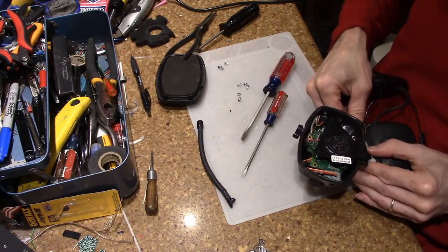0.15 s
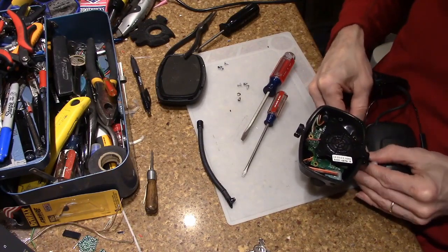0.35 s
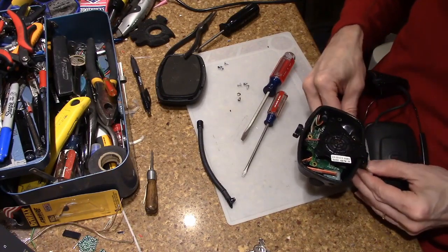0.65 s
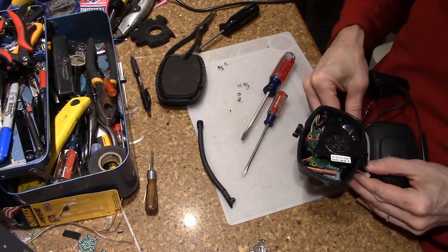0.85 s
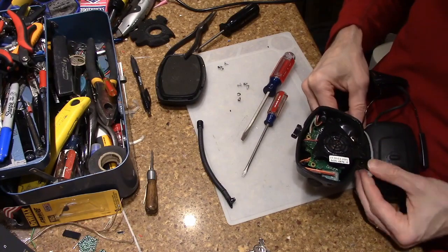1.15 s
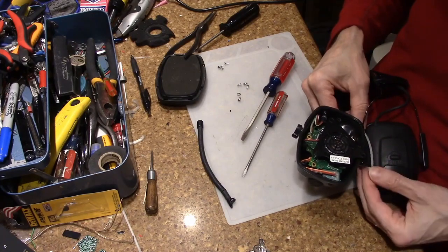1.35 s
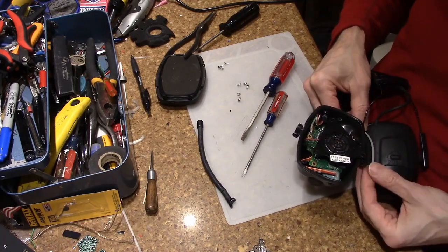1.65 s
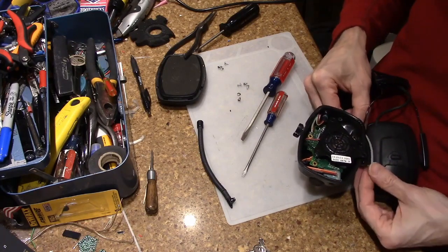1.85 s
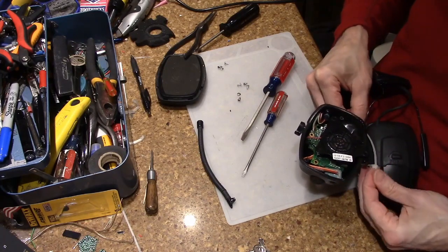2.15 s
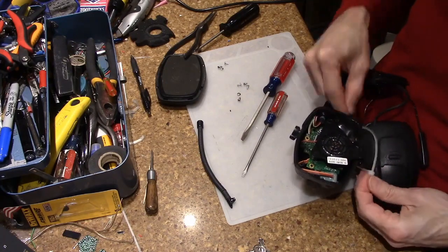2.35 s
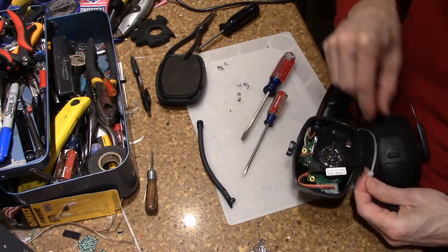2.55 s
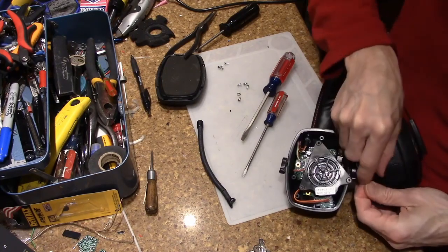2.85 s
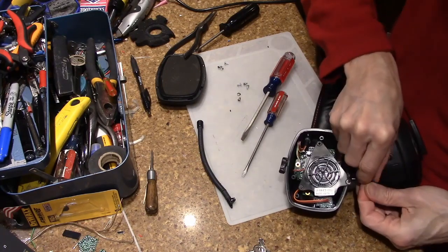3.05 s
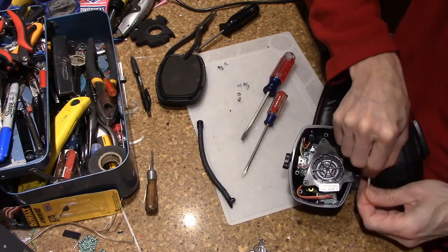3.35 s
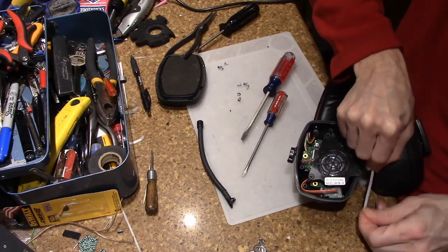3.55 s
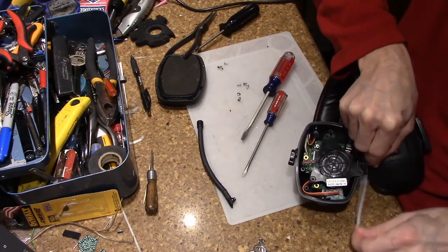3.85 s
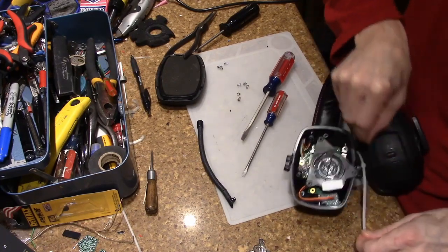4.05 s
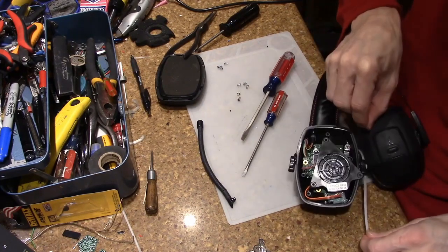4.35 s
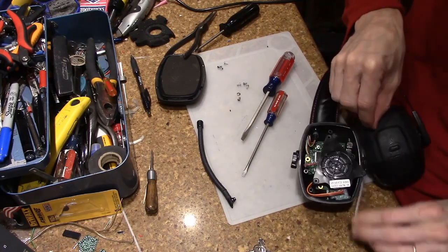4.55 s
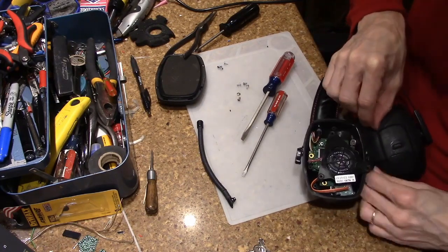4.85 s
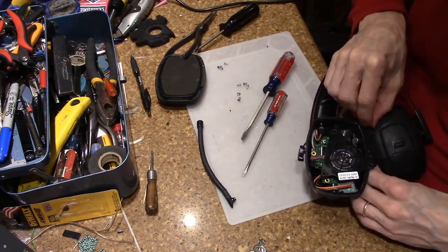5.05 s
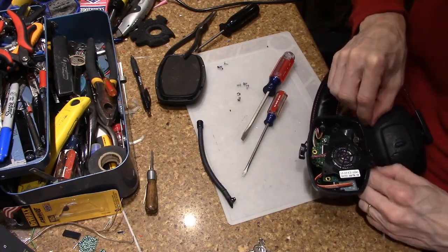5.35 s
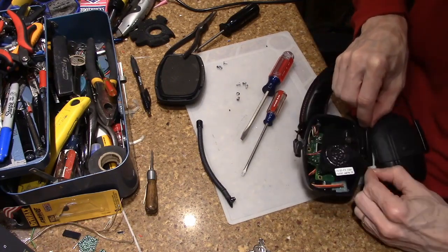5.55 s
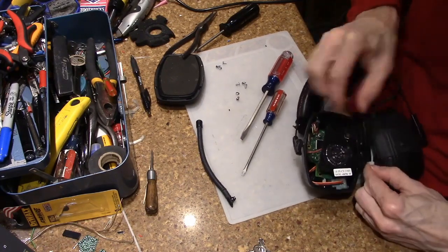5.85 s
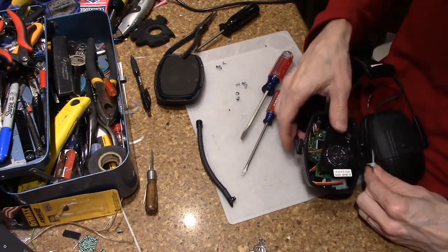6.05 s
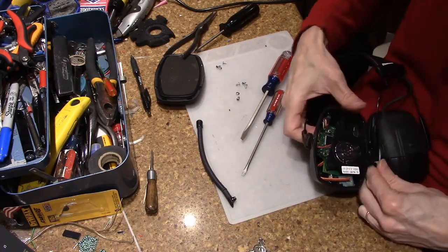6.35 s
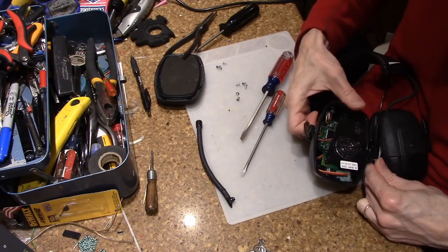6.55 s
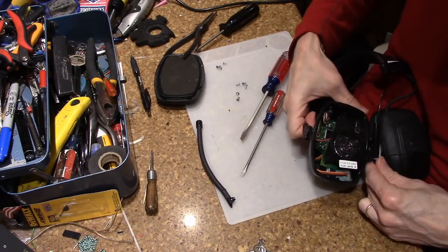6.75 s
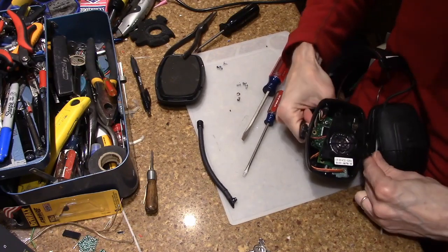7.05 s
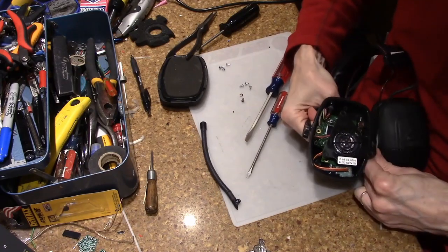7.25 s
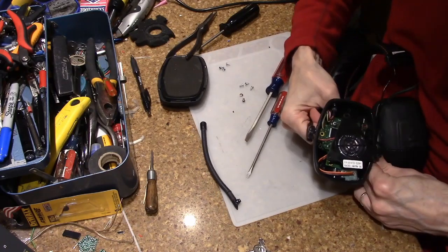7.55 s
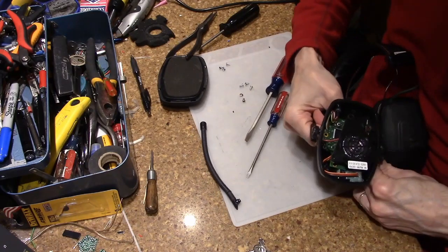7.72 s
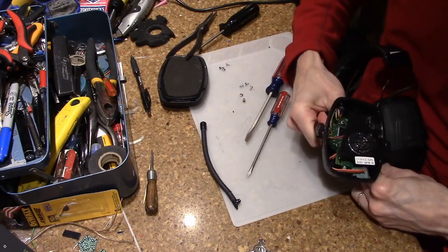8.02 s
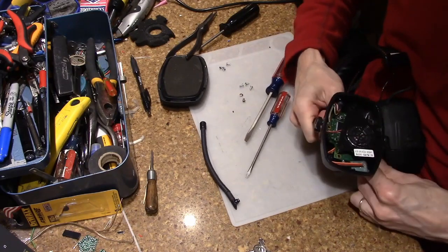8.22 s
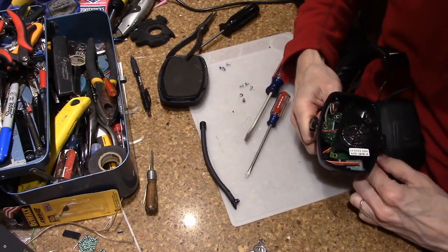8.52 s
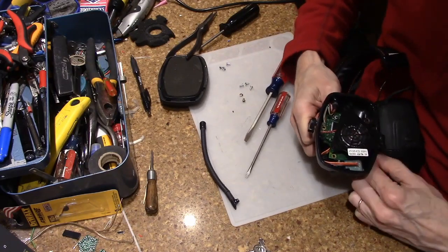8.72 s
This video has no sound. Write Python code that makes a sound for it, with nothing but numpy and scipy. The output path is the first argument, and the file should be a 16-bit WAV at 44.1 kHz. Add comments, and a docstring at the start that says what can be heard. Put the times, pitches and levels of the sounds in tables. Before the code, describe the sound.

Close handling of hollow plastic earmuff cups at a workbench. Faint ticks and rubs come first, then a cable tie is pulled tight with a half-second ratchety zip, followed by a cluster of bright clicks. After a quiet spell a loud hollow clatter with a low bench thump lands, then smaller clacks and scrapes. A small room answers lightly, with soft background noise and faint hum.

```python
"""A pawl buzzes over the teeth of a plastic cable tie pulled round an earmuff cup on a workbench, while
the hollow cups click, rub, knock together and thump on the bench, over soft room noise and faint hum.
Tooth snaps and contacts are filtered noise bursts; the shell and bench add decaying modes, and the strap
a resonance. Rubs are uneven noise from many slips. A small room answers with a dense decaying tail."""
import sys
import numpy as np
from scipy import signal
from scipy.fft import rfft, irfft
from scipy.io import wavfile

SR = 44100
rng = np.random.default_rng(int(sys.argv[2]) if len(sys.argv) > 2 else 0)


def dump(signal):
    """Clip the signal to [-1, 1] and save it as 16-bit WAV at the path in sys.argv[1]."""
    limited = np.clip(np.atleast_2d(signal).T, -1, 1)
    pcm = np.round(limited * 32767).astype(np.int16)
    wavfile.write(sys.argv[1], SR, pcm)


N = 391608
TIME = np.arange(N) / SR  # s
AGE = TIME[:2 ** 14]  # s since the start of one impact

# Modes of the cup shell, levels relative to each other: frequency_hz, level_db, t60_s
SHELL_MODES = [(447, -29, 0.3), (728.4, -18, 0.14), (845, -31.5, .16), (998, -21.5, 0.075),
               (1217, -25, 0.097), (1348, -29, 0.089), (1504, -31, 0.19), (1830, -16, 0.04),
               (1928, -17.5, 0.063), (2802, -19, 0.054), (2970, -18.5, 0.029), (3140, -23.5, .1),
               (4590, -18.5, 0.1), (6240, -16, 0.061)]
# Fingers and strap sliding on the shell, before the scene's rub gain:
# start_s, length_s, level_db, tilt_db_per_octave
RUB_STROKES = [(0.324, 0.26, -66, 4), (0.512, .21, -60.5, -1.5), (1.152, 0.14, -62, .5),
               (2.222, 0.29, -56, .5), (2.813, .16, -54.5, 0.5), (3.035, .07, -57.5, -3),
               (4.017, 0.35, -50, -1.5), (4.59, 0.074, -44, 1.5), (4.667, 0.117, -51.5, 3.5),
               (4.857, .17, -52.5, 1), (5.07, 0.26, -60, -0.5), (6.046, 0.16, -51, 2.5),
               (6.214, 0.085, -44, 1), (6.278, 0.39, -51, 0.6), (6.662, 0.398, -57, 1.3),
               (7.119, .18, -51, -1.5), (7.535, .2, -53.5, -1.5), (8.1, .11, -49.5, -3),
               (8.35, 0.037, -40.5, 2), (8.77, .16, -55, -1.5)]


def undb(db):
    """Level is logarithmic: 20 dB is a factor of ten in amplitude."""
    return 10 ** (np.asarray(db) / 20)


def unit(x):
    """Root-mean-square normalisation: scale a signal to rms 1."""
    return x / np.sqrt(np.mean(x ** 2))


def bins(x):
    """Discrete Fourier frequencies of x in Hz, kept at 1 Hz or more for logarithms."""
    return np.maximum(np.fft.rfftfreq(len(x), 1 / SR), 1)


def colour(x, points, extra_db=0):
    """Minimum-phase filtering: a folded cepstrum turns (Hz, dB) points into a causal response."""
    hz, db = np.transpose(points)
    gain_db = np.interp(np.log(bins(x)), np.log(hz), db) + extra_db
    cepstrum = irfft(np.log(undb(gain_db)), len(x))
    half = len(x) // 2
    cepstrum[1:half] *= 2
    cepstrum[half + 1:] = 0
    return irfft(rfft(x) * np.exp(rfft(cepstrum)), len(x))


def add(track, s, sound):
    """Superposition: mix a sound in at time s, cut at the end of the track."""
    start = int(s * SR)
    track[start:start + len(sound)] += sound[:max(N - start, 0)]


def burst(decay_s):
    """Exponential decay: noise whose amplitude falls by a factor e in decay_s."""
    return rng.standard_normal(len(AGE)) * np.exp(-AGE / max(decay_s, 1 / SR))


def strike(x):
    """Onset normalisation: scale a hit so that its first 10 ms have rms 1."""
    return x / np.sqrt(np.mean(x[:SR // 100] ** 2))


def walk(rate):
    """Slow random fluctuation: normal draws, rate per second, joined by straight lines."""
    return np.interp(TIME * rate, np.arange(N // 16), rng.standard_normal(N // 16))


def ring(hz, db, t60_s):
    """Damped free vibration: a sine whose level falls 60 dB in t60_s."""
    return undb(db - 60 * AGE / t60_s) * np.sin(2 * np.pi * hz * AGE)


def cable_tie(pawl_db=-35.5, scatter_db=0.1, jitter=0.02, catch_s=3.3747, catch_db=-38):
    """Periodic impacts make a buzz: the pawl snaps off each tooth, and the teeth pluck a resonant strap."""
    # Speed of the strap through the head, in two tugs: time_s, teeth_per_s
    pull = [(3.386, 240), (3.417, 320), (3.465, 108), (3.52, 178), (3.57, 308), (3.665, 190), (3.725, 217),
            (3.772, 206), (3.795, 118), (3.821, 97)]
    # Colour of the pawl's clicks: frequency_hz, gain_db
    pawl_colour = [(100, -19), (450, -8), (1200, 3), (1450, -8), (1850, 2.5), (2450, -4.5), (3050, 1.5),
                   (4100, -3), (5400, -2), (6500, 2), (10000, 2), (13000, -0.5), (15500, -1)]
    # The cup resonances that the pulled strap shakes: frequency_hz, gain_db
    shake_colour = [(300, -26), (1400, -15), (1800, -1), (2100, -4), (2500, -14), (3080, 7.5), (3700, -22),
                    (9000, -17)]
    snap_s, ring_s, ring_db = 0.0006, 0.008, -17  # decays of snap and head's ring, level of the ring
    own_db = -7  # noise that differs from tooth to tooth
    rebound_s, rebound_db = 0.0013, -4
    return_s, return_s_per_tooth, return_db = 0.0006, 0.000009, -5
    jerk_s, jerk_width_s, jerk_db = 3.41, 0.011, 1
    shake_db = -44
    taut_s, slack_s, taut_fade_s = 3.52, 3.805, 0.064
    strap_hz, strap_width_hz, strap_db, pluck_scatter_db = 837, 93, -43, 2

    s, speed = np.transpose(pull)
    rate = np.interp(TIME, s, speed) * (1 + jitter * walk(200))
    pulling = (TIME > s[0]) & (TIME < s[-1])
    # the first jerk presses the pawl harder
    jerk = np.exp(-((TIME - jerk_s) / jerk_width_s) ** 2)
    level_db = pawl_db + jerk_db * jerk
    # a tooth passes whenever the accumulated count crosses a whole number
    teeth = np.flatnonzero(np.diff(np.ceil(np.cumsum(rate * pulling) / SR)))
    plucks = np.zeros(N)
    plucks[teeth] = undb(pluck_scatter_db * rng.standard_normal(len(teeth)))

    # all teeth strike the same head, so their clicks are alike and merge into a buzz
    head = burst(snap_s) + undb(ring_db) * burst(ring_s)
    pawl = np.zeros(N)
    for tooth, i in enumerate(teeth):
        # dividing by the root of the rate keeps the mean power steady with speed
        snap = undb(level_db[i] + scatter_db * rng.standard_normal()) / np.sqrt(rate[i])
        tooth_s = i / SR
        add(pawl, tooth_s, snap * (head + undb(own_db) * burst(2 * snap_s)))
        # the snap runs along the strap and returns, later as the strap is drawn out
        add(pawl, tooth_s + return_s + return_s_per_tooth * tooth, snap * undb(return_db) * head)
        rebound = burst(snap_s) + undb(ring_db) * burst(ring_s)
        add(pawl, tooth_s + rebound_s * rng.uniform(0.76, 1.3), snap * undb(rebound_db) * rebound)

    # fast teeth and the first jerk shake the cup as well
    shake = colour(pawl * (jerk + (rate / speed.max()) ** 2 / 2), shake_colour)
    shake *= undb(shake_db) / np.std(shake[pulling])
    pawl = colour(pawl, pawl_colour)
    pawl *= np.sqrt(np.mean(undb(level_db[pulling]) ** 2)) / np.std(pawl[pulling])
    # the first tooth catches a moment before the run
    add(pawl, catch_s, undb(catch_db) * strike(colour(head, pawl_colour)))
    # the taut free length picks out a multiple of the tooth rate
    taut = np.clip(np.minimum(TIME - taut_s, slack_s - TIME) / taut_fade_s, 0, 1)
    peak = signal.iirpeak(strap_hz, strap_hz / strap_width_hz, fs=SR)
    strap = signal.lfilter(*peak, plucks * taut + 1e-18)  # the offset avoids denormal numbers
    strap *= undb(strap_db) / np.std(strap[taut > 0])
    return pawl + shake + strap


def clicks(crack_s=0.002, rise_s=0.0004, hollow_s=0.011, hollow_db=-13, rattle_db=5, heavy_db=-12):
    """Impact excites modes: each contact grazes, cracks, rattles in the hollow cup and rings the shell."""
    # Hard plastic contacts on the cups, extra body under about 1 kHz and edge over about 5 kHz:
    # start_s, level_db, body_db, edge_db, struck_part_hz
    contacts = [(.048, -61, 16.5, 14, 830), (.739, -50, 15, -3, 835), (.818, -54, -3, -4, 1170),
                (0.91, -47.5, 10.5, -2.5, 1950), (1.105, -46, -18, -27, 2050), (1.275, -54.5, 19, 5, 1440),
                (1.297, -60.5, 11, 13, 890), (2.332, -46.5, 10, 4, 2260), (2.358, -47, 11.5, 6.5, 1130),
                (2.687, -47, -15, -10, 3150), (2.884, -39.5, -3, -19, 1730), (2.899, -37.5, -22, -18, 1730),
                (3.825, -22, 2, 2.5, 5600), (3.8308, -23, -9, 8.5, 3118), (3.855, -26, -11, 6.5, 2100),
                (3.881, -27, -18, -9, 2630), (3.916, -32.5, -13, 2, 5570), (3.924, -27.5, -9, -3, 5470),
                (3.937, -25, 0, -0.5, 2990), (4.0005, -28.5, -8, -4.5, 2900), (4.071, -38, 1, 1, 6470),
                (4.195, -38, -24, -1, 3030), (4.212, -38, -16, -4.5, 1910), (4.288, -40, -2, -3.5, 1730),
                (4.965, -45, 11, 1, 3340), (5.082, -55, 8, 15, 10150), (5.3102, -42, -5, 4, 3050),
                (5.4936, -41.5, 0, 3.5, 4860), (5.5317, -18, 11.5, -1.5, 3120), (5.5453, -12.5, 0, 3, 3170),
                (5.5486, -15, 9, 1, 1290), (5.5555, -16, 14.5, -13, 730), (5.562, -13, 5.5, 0.5, 1390),
                (5.5944, -16.5, -0.5, -15, 2940), (5.5989, -19.5, -0.5, -0.5, 1380),
                (5.6105, -26, 15, -3, 1360), (5.699, -34, -16, 4, 2260), (5.7404, -24, -3, -2, 6100),
                (5.766, -29.5, 11, -3, 1050), (5.838, -38, -6.5, -7, 6300), (6.0952, -36.5, -6, -20, 1720),
                (6.143, -40, 4, -8, 6260), (6.203, -40, 5, -11, 1880), (6.334, -43.5, 11, 2, 1800),
                (6.5452, -21.5, -5, -7, 2660), (6.592, -31, -3, -13.5, 1871), (6.624, -40, 10.5, -11, 1870),
                (6.857, -44.5, -13, -12, 1880), (7.394, -46.5, 10.5, -8.5, 2970),
                (7.449, -46, 10, -16, 2010), (7.537, -40.5, -1, -6, 1690), (7.5491, -37, 2.5, 0, 1520),
                (7.565, -35, 5, 1, 1540), (7.647, -42, 6.5, -11, 1940), (7.819, -41, 5, -15, 1880),
                (7.9405, -23, -3.5, -5.5, 3340), (7.946, -27.5, 9, -9, 1800), (7.973, -29, 4.5, -27, 1420),
                (7.9897, -25, 1, -4, 1850), (8.0, -28, -5, -1, 6100), (8.028, -28.5, -1.5, -12, 1860),
                (8.296, -44, -1, 3, 1930), (8.369, -37.5, 8.5, 6, 5240), (8.715, -56.5, 7, 16, 7460),
                (8.761, -48.5, 13.5, 7, 7840)]
    # Colour of a plastic contact: frequency_hz, gain_db
    contact_colour = [(30, -32), (250, -23.5), (500, -11), (750, -9.5), (1300, 0.5), (1900, -0.5),
                      (2400, -3.5), (3050, -1.5), (4000, -7.5), (6200, -4.5), (7500, -8.5), (10000, -12),
                      (15000, -31)]
    shell_db, body_hz, edge_hz = -6, 700, 4800
    part_db, part_width = 5, 0.11  # peak of the struck part, half-width in natural-log frequency
    graze_s, graze_db, graze_share = 0.0052, -25, 0.25

    out, f = np.zeros(N), bins(AGE)
    rings = np.array([ring(hz, db + shell_db, t60_s) for hz, db, t60_s in SHELL_MODES])
    body = 1 / (1 + (2 * np.log(f / body_hz)) ** 4)
    edge = 1 / (1 + (edge_hz / f) ** 4)
    press = 1 - np.exp(-AGE / rise_s)
    for s, db, body_db, edge_db, part_hz in contacts + dragged_strap() + faint_ticks():
        # the place of the contact decides how strongly each mode answers
        shares = rng.choice([-1, 1], len(SHELL_MODES)) * rng.uniform(0.49, 1.47, len(SHELL_MODES))
        crack = burst(crack_s)
        # heavy contacts rattle more
        rattle = undb(hollow_db + rattle_db * undb(db - heavy_db)) * burst(hollow_s)
        blow = press * (crack + rattle + shares @ rings)
        part = part_db / (1 + (np.log(f / part_hz) / part_width) ** 2)
        hit = strike(colour(blow, contact_colour, part))
        add(out, s, colour(hit, [(1, db)], body_db * body + edge_db * edge))
        # a short scrape swells up to the contact, relatively louder for light touches
        graze = strike(colour(burst(graze_s), contact_colour))[:SR // 50]
        graze_gain = undb(db + graze_db + graze_share * (heavy_db - db))
        add(out, s - len(graze) / SR, graze_gain * graze[::-1])
    return out


def dragged_strap(start_s=8.775, count=20, ticks_per_s=115, level_db=-42.5, scatter_db=3.0, uneven=0.143):
    """Quasi-periodic impacts, like a ribbed strap dragged over an edge; rows as in contacts."""
    body_db, edge_db, part_hz = 8.5, 3, 1600
    rows = []
    for i, (late, size) in enumerate(rng.standard_normal((count, 2))):
        s = start_s + (i + uneven * late) / ticks_per_s
        rows.append((s, level_db + scatter_db * size, body_db, edge_db, part_hz))
    return rows


def faint_ticks(count=160, over_rub_db=2.5, scatter_db=4.5, body_db=2.5, edge_db=-9):
    """Stick-slip: while something slides, an edge catches on a middle shell mode; rows as in contacts."""
    parts = [hz for hz, _, _ in SHELL_MODES if 1400 < hz < 3300]
    rows = []
    for i, (when, size, place) in enumerate(rng.random((count, 3))):
        s = (i + when) / count * N / SR
        part_hz = parts[int(place * len(parts))]
        for start, length, db, tilt_db in RUB_STROKES:
            if start < s < start + length:
                tick_db = db + over_rub_db + scatter_db * (2 * size - 1)
                rows.append((s, tick_db, body_db, edge_db + 2 * tilt_db, part_hz))
    return rows


def knocks(bench_s=0.00601, thud_db=-4):
    """Soft impact favours low frequencies: padded pushes sound the cavity, weight sways the bench."""
    # Padded knocks of cups and headband: start_s, level_db, decay_s
    pads = [(.7385, -53, 0.0086), (2.197, -51.5, 0.042), (3.838, -36.5, 0.017), (4.599, -36, 0.028),
            (4.627, -46, 0.013), (5.532, -37, 0.0028), (5.553, -22.5, 0.015), (5.595, -38, 0.0099),
            (6.111, -47, 0.0081), (6.2269, -35, .016), (6.253, -39.5, 0.013), (6.546, -36.5, .01)]
    # Colour of a padded knock: frequency_hz, gain_db
    pad_colour = [(30, -51.5), (200, -18.5), (320, -7), (560, -2.5), (800, -4), (1400, -17.5), (3000, -16),
                  (9000, -48)]
    # Weight landing on the bench top: start_s, level_db
    thumps = [(2.677, -58), (3.847, -44.5), (5.339, -48), (5.558, -41), (5.587, -34.5), (6.071, -52),
              (6.553, -51)]
    # Colour of the bench thud: frequency_hz, gain_db
    bench_colour = [(30, -34.5), (65, -9), (100, -3.5), (135, -11), (250, -15.5), (450, -16.5),
                    (1000, -30.5), (5000, -56.5)]
    # Swaying modes of the bench top, relative to the thump: frequency_hz, level_db, t60_s
    bench_modes = [(70.86, -16.5, 0.17), (101, -5, 0.2)]

    out = np.zeros(N)
    for s, db, decay_s in pads:
        add(out, s, undb(db) * strike(colour(burst(decay_s), pad_colour)))
    sway = sum(ring(hz, db, t60_s) for hz, db, t60_s in bench_modes)
    sway = sway * (1 - np.exp(-AGE / bench_s))
    for s, db in thumps:
        thud = colour(burst(bench_s), bench_colour)
        thud *= undb(thud_db) / np.std(thud[:SR // 40])
        add(out, s, undb(db) * (sway + thud))
    return out


def rubs(grain_db=3.0, uneven_db=2, fade=0.35, pivot_hz=2000, ease_db=3):
    """Friction noise: a crowd of tiny slips of unequal size comes and goes; each stroke eases off."""
    # Colour of rubbing: frequency_hz, gain_db
    rub_colour = [(50, -30), (300, -7.5), (700, 3), (1300, 2), (1900, 1), (2400, -3.5), (3100, -4),
                  (4000, -5.5), (6200, -6), (10000, -16.5), (15000, -30.5)]
    sing_hz, sing_octaves_per_db, sing_db, sing_width = 2100, -0.1, 8, 0.2

    out = np.zeros(N)
    sizes = undb(grain_db * np.minimum(rng.exponential(size=N), 7))
    slips = unit(rng.standard_normal(N) * sizes) * undb(uneven_db * walk(70))
    for s, length, db, tilt_db in RUB_STROKES:
        stroke = slips[int(s * SR):int((s + length) * SR)]
        size = len(stroke)
        stroke = stroke * undb(-ease_db * np.linspace(0, 1, size)) * signal.windows.tukey(size, fade)
        stroke = np.pad(stroke, (0, 2 ** 15 - size))
        # the rubbed wall sings a little, lower under a brighter stroke; its peak is sing_db / 3
        f = bins(stroke)
        octaves = np.log2(f / sing_hz) - sing_octaves_per_db * tilt_db
        sing = sing_db / (3 + (octaves / sing_width) ** 2)
        stroke = colour(stroke, rub_colour, tilt_db * np.log2(f / pivot_hz) + sing)
        add(out, s, undb(db) * stroke / np.std(stroke[:size]))
    return out


def room(x, t60_s=0.43, treble_t60_s=0.31, split_hz=5000, gap_s=0.0031):
    """Reverberation: dense reflections from bench and walls decay, the treble first."""
    # What the walls send back: frequency_hz, gain_db
    walls = [(80, -0.5), (300, -6), (800, -7), (2000, -8), (6000, -8.5), (15000, -13)]
    age = TIME[:SR]
    noise = rng.standard_normal(SR)
    low = signal.sosfiltfilt(signal.butter(2, split_hz, fs=SR, output="sos"), noise)
    tail = low * undb(-60 * age / t60_s) + (noise - low) * undb(-60 * age / treble_t60_s)
    tail = tail * (age > gap_s)
    return signal.fftconvolve(x, colour(tail / np.linalg.norm(tail), walls))[:N]


def sideways(x, spread_s=0.026):
    """Decorrelation: reflections from the side reach the two microphones differently."""
    # Difference between the two microphones: frequency_hz, gain_db
    stereo_width = [(300, -16), (800, -40.5), (2500, -19), (10000, -16)]
    paths = burst(spread_s)
    return signal.fftconvolve(x, colour(paths / np.linalg.norm(paths), stereo_width))[:N]


def background(air_db=-56.5, side_db=-14, waver_db=1.7, hum_hz=120, hum_db=-71, whine_hz=11100, whine_db=-85):
    """Stationary noise and tones: room noise, mains hum and a thin high whine, as mid and side."""
    # Room noise, relative spectral density: frequency_hz, level_db
    air_colour = [(25, -31.5), (60, -11.5), (110, -4.5), (200, -2.5), (290, 0), (640, -3.5), (1000, -5.5),
                  (2000, -12), (6000, -20.5), (11000, -27.5), (16000, -37)]
    air, side = (undb(air_db) * unit(colour(rng.standard_normal(N), air_colour)) for _ in range(2))
    hum = undb(hum_db) * unit(np.sin(2 * np.pi * hum_hz * TIME))
    whine = undb(whine_db) * unit(walk(300) * np.sin(2 * np.pi * whine_hz * TIME))
    return air * undb(waver_db * walk(2.72)) + hum + whine, undb(side_db) * side


def scene(rubs_db=-1):
    """Mid-side stereo: the direct handling is central, side reflections and air differ left and right."""
    handling = cable_tie() + clicks() + knocks() + undb(rubs_db) * rubs()
    air, air_side = background()
    mid = handling + room(handling) + air
    side = sideways(handling) + air_side
    return np.array([mid + side, mid - side])


def record(dry):
    """Saturation and band limiting: the highest peaks are rounded and the top above 16 kHz is cut."""
    low_pass = signal.ellip(10, 0.2, 80, 16000, fs=SR, output="sos")
    return signal.sosfilt(low_pass, np.tanh(dry))


dry = scene()
out = record(dry)
dump(out)
```